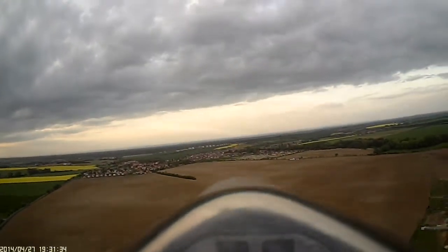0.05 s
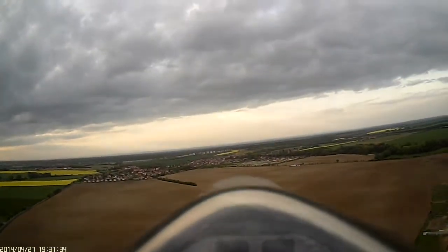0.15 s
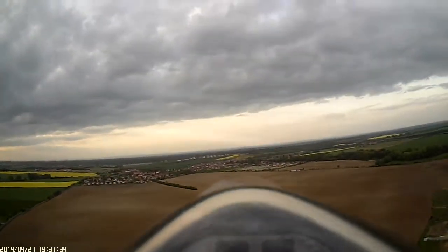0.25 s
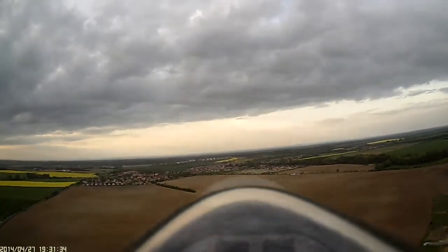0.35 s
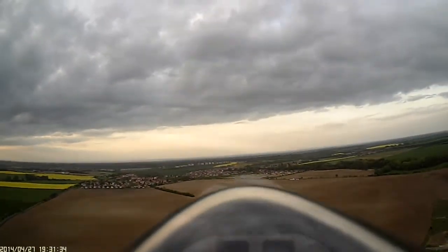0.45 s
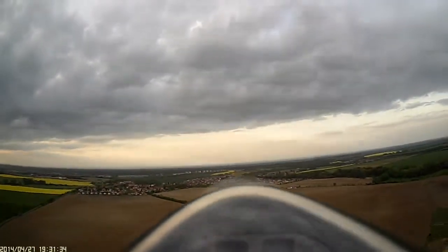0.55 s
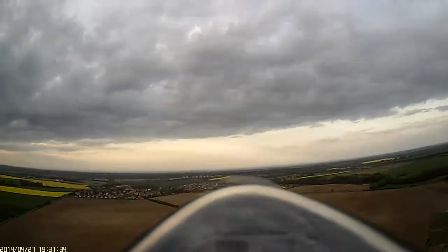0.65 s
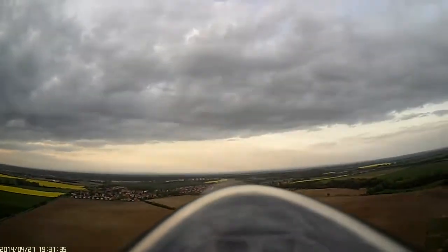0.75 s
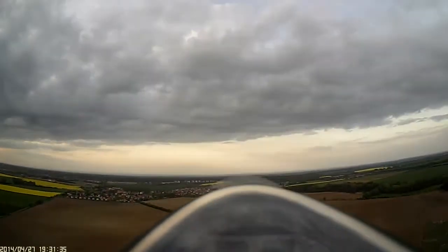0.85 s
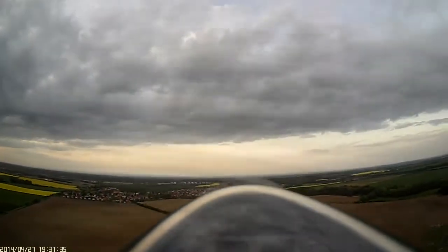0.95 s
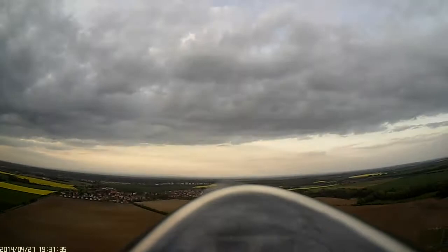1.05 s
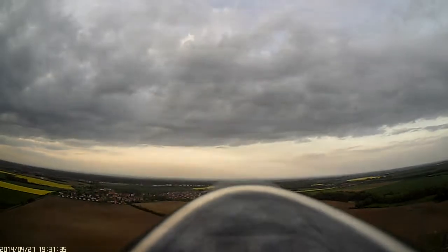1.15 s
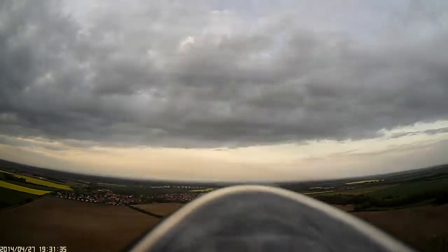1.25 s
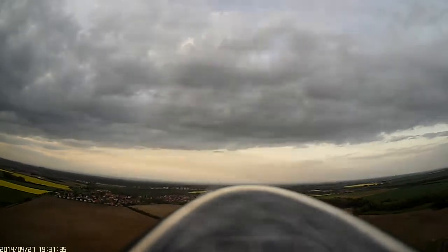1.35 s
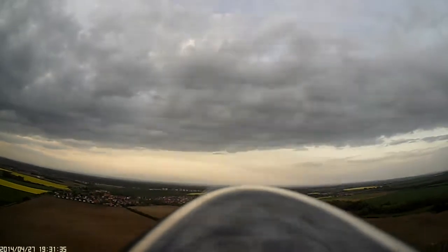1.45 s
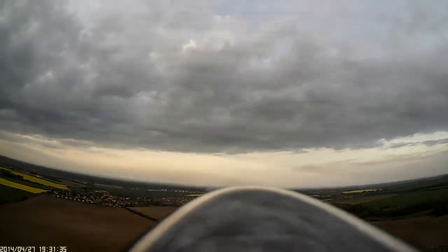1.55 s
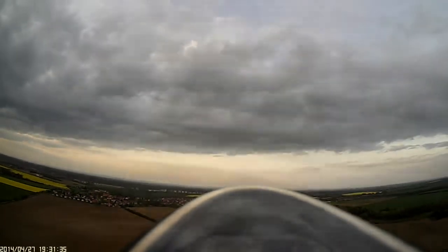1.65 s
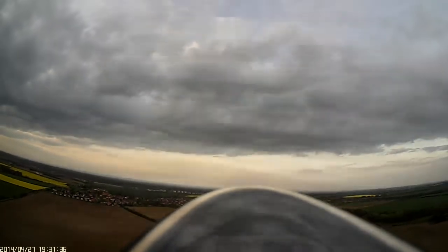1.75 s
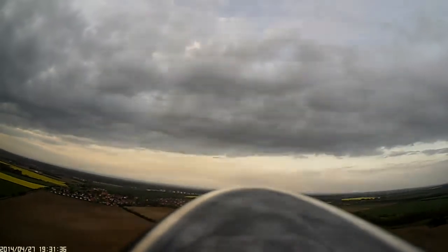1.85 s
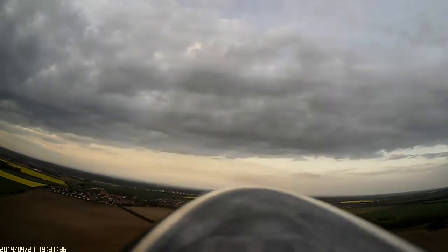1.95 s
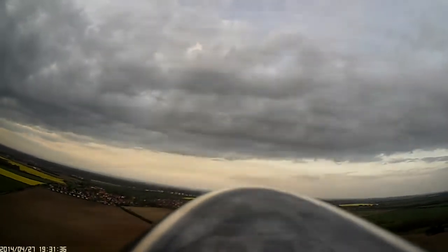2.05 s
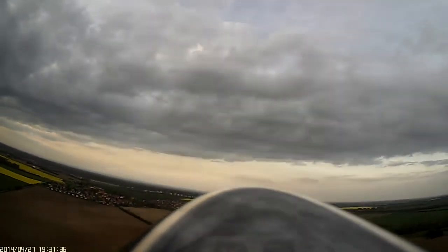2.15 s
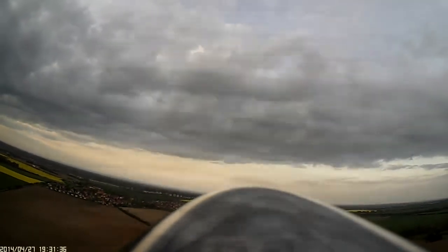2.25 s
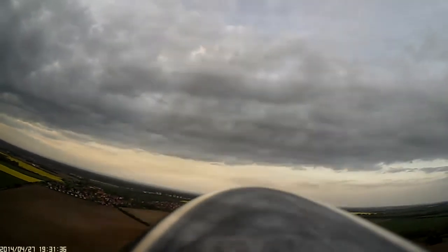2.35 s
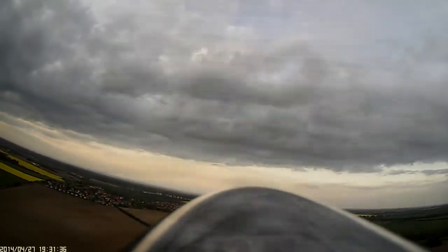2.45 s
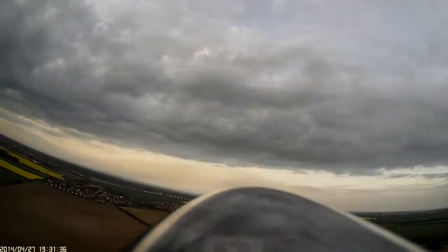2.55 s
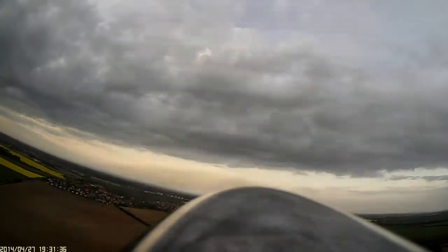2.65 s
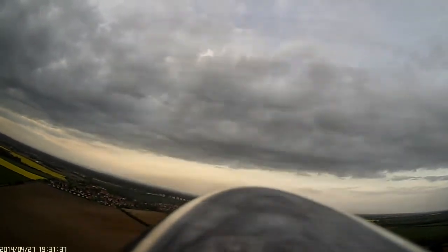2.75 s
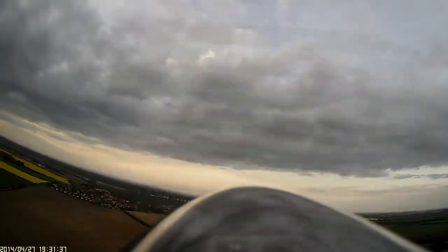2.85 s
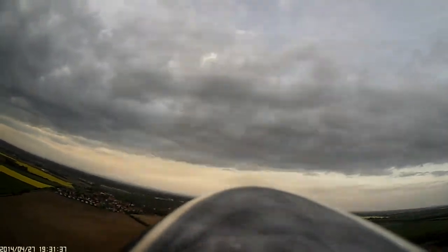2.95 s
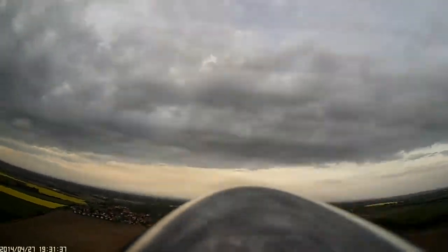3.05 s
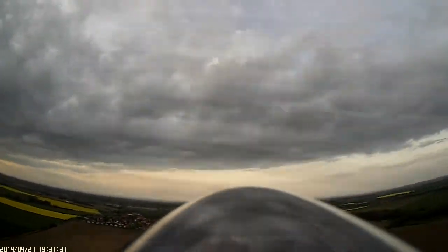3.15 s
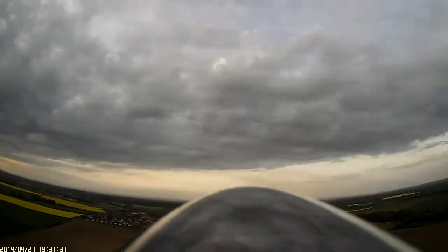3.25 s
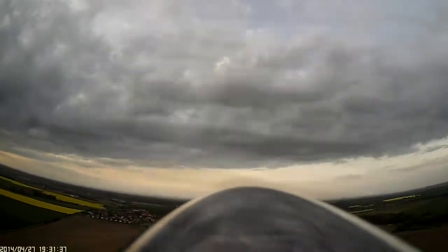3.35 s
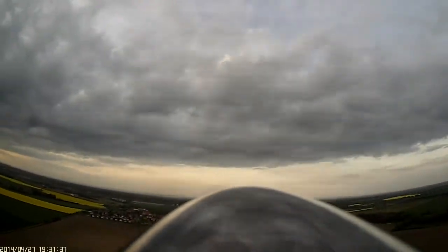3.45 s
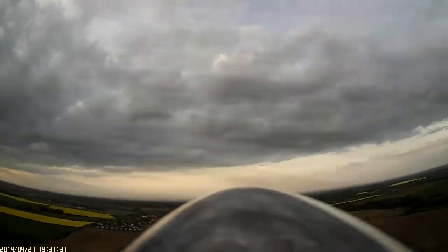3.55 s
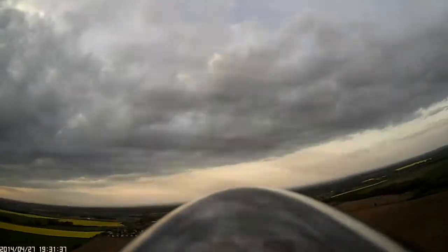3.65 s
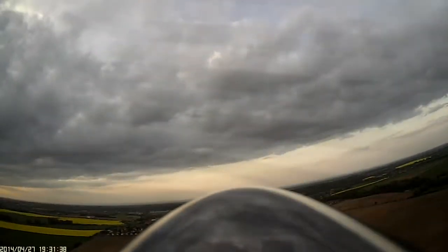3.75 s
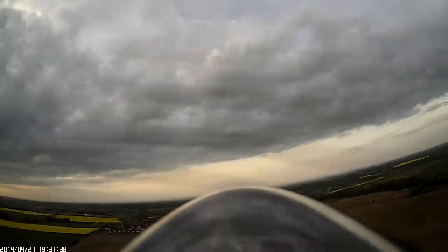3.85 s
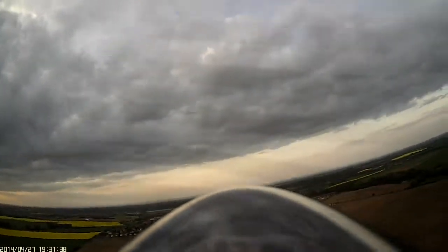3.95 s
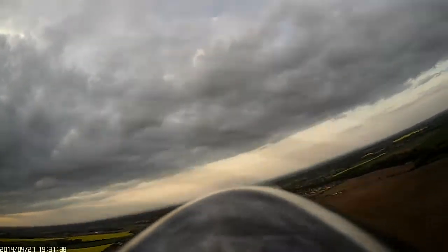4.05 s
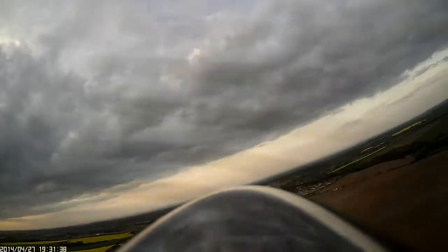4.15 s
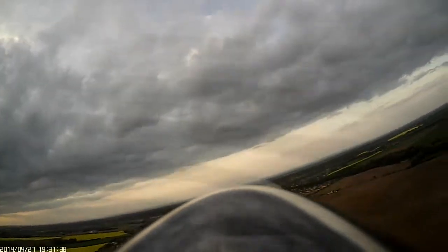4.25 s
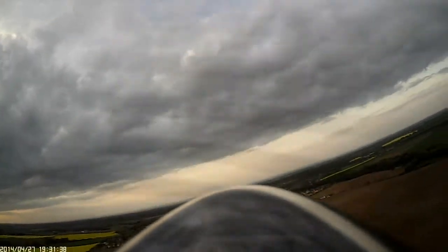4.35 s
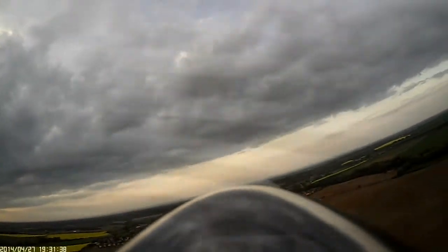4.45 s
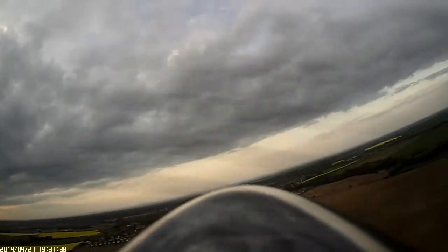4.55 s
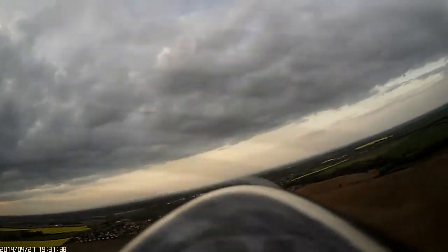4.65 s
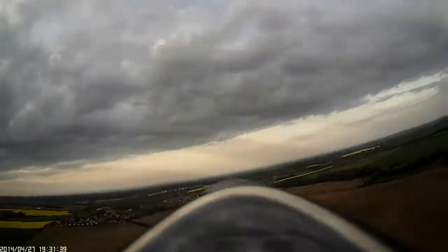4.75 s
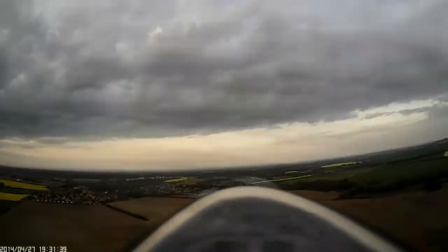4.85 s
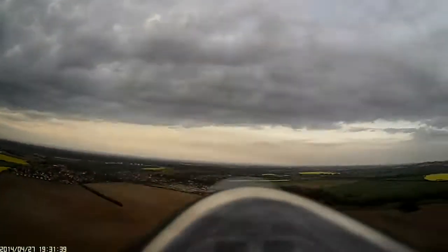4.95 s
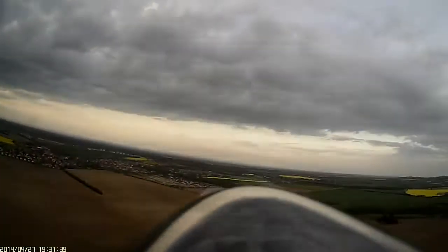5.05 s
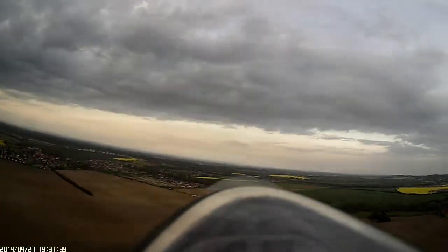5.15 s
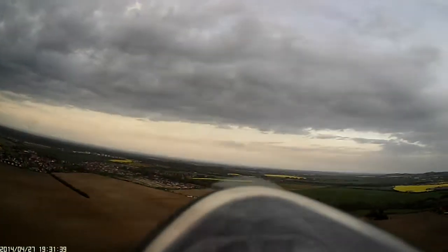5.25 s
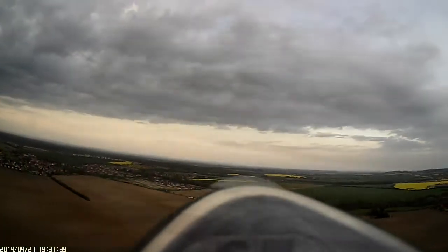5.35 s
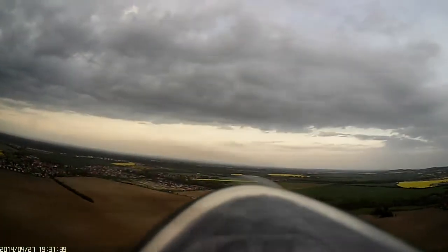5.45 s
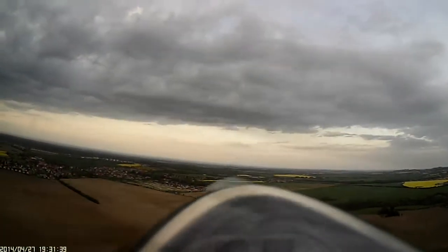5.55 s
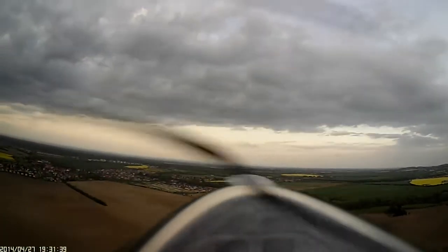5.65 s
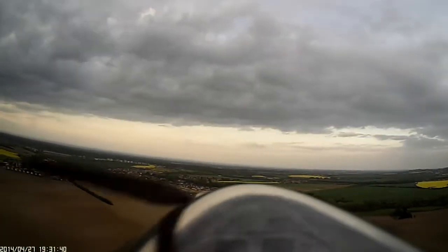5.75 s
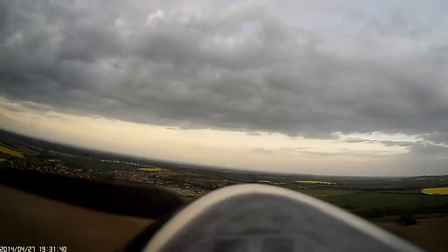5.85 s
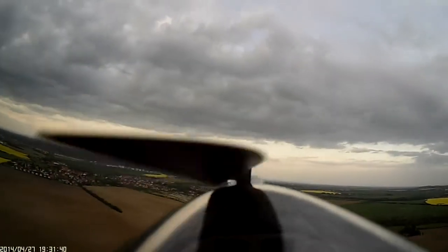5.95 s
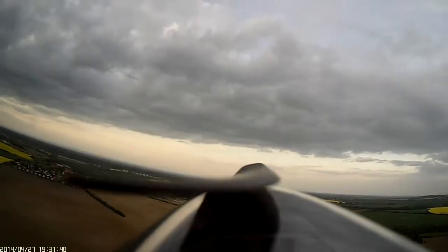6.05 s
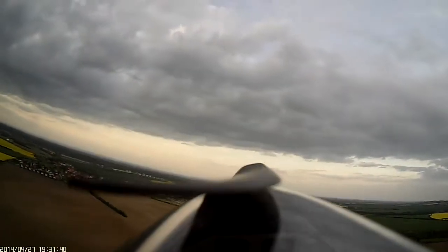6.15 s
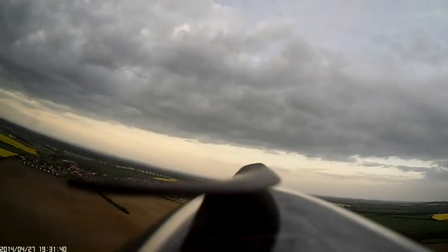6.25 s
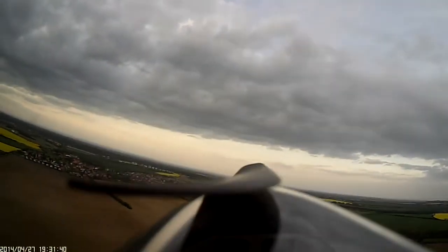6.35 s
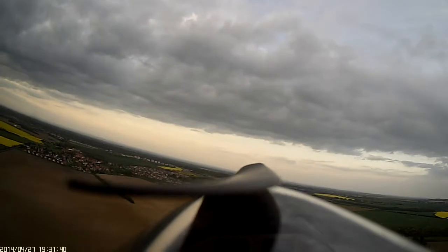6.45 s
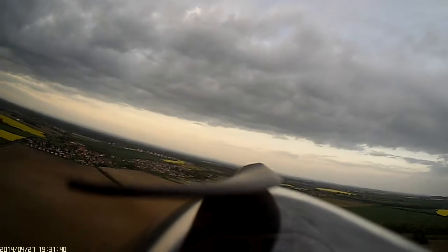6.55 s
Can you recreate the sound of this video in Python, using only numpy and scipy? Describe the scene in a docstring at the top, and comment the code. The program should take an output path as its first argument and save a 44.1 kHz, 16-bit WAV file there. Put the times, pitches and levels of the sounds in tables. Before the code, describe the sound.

On board a small electric model aircraft in open air, wind and prop wash batter the microphone into harsh, constant distortion, fluttering rapidly with the propeller blades. Near the end the motor runs down: a noisy howl rises and then sinks, the last blade passes thump, folding blades click, and only quieter, gusty gliding wind with a light spitting fizz remains.

```python
"""In open air behind the propeller of a small electric model aircraft, prop wash and wind buffet a microphone
into hard clipping: noise shaped in colour and level, chopped at the blade rate over a faint blade tone.
As the motor runs down a band of noise howls past, rising then sinking in pitch; the hiss of the windings
stops as it fades. The last blade wakes thump as short swings, the folding blades click as ringing cracks,
and gusty noise with a spitting fizz is left as the gliding wind."""
import sys
import numpy as np
from scipy import signal
from scipy.fft import rfft, irfft, next_fast_len
from scipy.io import wavfile
from scipy.ndimage import uniform_filter1d, map_coordinates

SR = 44100
rng = np.random.default_rng(int(sys.argv[2]) if len(sys.argv) > 2 else 0)


def transcribe(u):
    """Save the signal u as a 16-bit wav file named by the first command-line argument.

    u: samples, shape (n,) or (channels, n), limited to [-1, 1]; the rate is SR.
    q: integer samples, one column per channel.
    """
    v = np.clip(np.atleast_2d(u).T, -1, 1)
    q = np.round(v * 32767).astype(np.int16)
    wavfile.write(sys.argv[1], SR, q)


def undo_db(level):
    """Turn decibels back into plain size, where 20 dB means ten times bigger."""
    steps = np.asarray(level, float) / 20
    return 10 ** steps


N = 291059
TIME = np.arange(N) / SR  # [s]

# Air behind the propeller: (time [s], buffet level [dB], wash level [dB])
FLOW_LEVELS = [(0, -7, -4), (1, -10.5, -5), (2, -9, -6), (3, -10.5, -7.5), (3.6, -9.5, -8.5),
               (4.3, -10.5, -10), (4.73, -9, -8), (5.08, -20.5, -12.5), (5.22, -18.5, -11),
               (5.49, -25.5, -18.5), (5.62, -36, -32), (5.7, -98, -104)]
# Blades: (time [s], mean blade passes [Hz], mean tone level [dB], relative depth of the chop [0-1])
BLADE_PASSES = [(0, 200.1, -39, 1), (2.5, 199.4, -26, 1), (4.8, 196.4, -27, 1), (5.2, 174.7, -37, 1),
                (5.4, 135.4, -38, .4), (5.56, 92, -53, 0.5)]
# Colour of the slow buffeting: (frequency [Hz], relative density [dB])
BUFFET_COLOUR = [(15, -16), (30, -11.5), (60, -3.5), (110, -0.5), (200, 2), (350, -4.5), (600, -15),
                 (1200, -21)]
# Colour of the wash eddies: (frequency [Hz], relative density [dB])
WASH_COLOUR = [(100, -17), (300, 1), (500, -0.5), (1000, -4), (1800, -9), (2600, -15)]
# Colour of the tip vortices: (frequency [Hz], relative density [dB])
VORTEX_COLOUR = [(1200, -23), (2200, -3.5), (3000, -3), (4500, -9), (7000, -16.5), (11000, -22),
                 (16000, -24)]
# Eddies shed as the thrust dies: (time [s], centre [Hz], level [dB])
HOWL_SWEEP = [(4.45, 280, -35), (4.7, 350, -14), (4.9, 470, -15), (5.05, 600, -13), (5.2, 730, -10.5),
              (5.35, 690, -12), (5.48, 560, -15.5), (5.58, 450, -20), (5.65, 400, -60)]
# Swings of the last blade wakes: (time [s], swing level [dB], swing frequency [Hz])
BLADE_WAKES = [(5.554, -8, 400), (5.565, -6, 430), (5.585, -9, 500), (5.613, -11, 130), (5.629, -6, 280),
               (5.649, -4, 130), (5.679, -10, 130), (5.713, -5, 200), (5.719, -4, 180), (5.771, -8, 170),
               (5.78, -6, 120)]
# Clicks of the blade hinges: (time [s], level [dB], ring [Hz])
HINGE_CLICKS = [(5.6155, -43, 6000), (5.632, -34, 5000), (5.6515, -41, 6000), (5.6794, -44, 9000),
                (5.7764, -28, 4500), (5.9145, -15, 8000), (6.2965, -41, 5000)]
# Free air over the nose: (time [s], wind level [dB])
GLIDE_LEVELS = [(5.4, -87), (5.5, -26), (5.58, -20), (5.7, -18), (5.81, -19.5), (5.89, -15.5), (5.935, -16),
                (5.953, -21), (5.965, -15.5), (6.1, -16), (6.2, -19), (6.3, -18.5), (6.6, -20.5)]
# Colour of the gliding wind: (frequency [Hz], relative density [dB])
WIND_COLOUR = [(12, -50), (20, -16), (63, -9), (90, -7.5), (160, -4), (300, -6.5), (600, -8.5),
               (1200, -13.5), (2500, -25), (4500, -42), (7000, -58), (16000, -99)]
# Colour of the fizz on the wind: (frequency [Hz], relative density [dB])
FIZZ_COLOUR = [(1500, -41), (3000, 0), (5000, -6), (8000, -14), (12000, -22), (16000, -28)]
# Motor windings: (time [s], hiss level [dB], depth of the braking ripple [0-1])
MOTOR_LEVELS = [(0, -32, 0), (3, -42, 0), (5.3, -45, 0), (5.42, -47, 0.7), (5.55, -48, 0.83),
                (5.575, -90, .9)]
# Colour of the winding hiss: (frequency [Hz], relative density [dB])
HISS_COLOUR = [(4000, -30), (7000, -2), (10000, -2), (14000, -2), (16000, -20)]


def unit(x):
    """Scaled to rms 1."""
    return x / np.sqrt(np.mean(x ** 2) + 1e-20)


def noise():
    """White noise for the whole scene."""
    return rng.standard_normal(N)


def curves(rows):
    """One value per sample for each column after the time."""
    times, *columns = np.transpose(rows)
    return [np.interp(TIME, times, column) for column in columns]


def wobble(rate):
    """A smooth random curve, rate knots a second."""
    knots = rng.standard_normal(int(N * rate / SR) + 4)
    return map_coordinates(knots, [TIME * rate])


def filtered(x, response):
    """x through a gain that is a function of frequency."""
    size = next_fast_len(N + SR // 2)
    gain = response(np.fft.rfftfreq(size, 1 / SR))
    return irfft(rfft(x, size) * gain, size)[..., :N]


def coloured(x, points):
    """x through (frequency [Hz], gain [dB]) points read on a log axis."""
    f, db = np.transpose(points)
    return filtered(x, lambda hz: undo_db(np.interp(np.log(hz + 1), np.log(f + 1), db)))


def turns(hz):
    """Running phase of a frequency curve."""
    return 2 * np.pi * np.cumsum(hz) / SR


def airflow():
    """Prop wash on the port: slow buffeting, eddies chopped by each blade pass, and spitting tip vortices."""
    buffet_db, wash_db = curves(FLOW_LEVELS)
    blade_hz, tone_db, chop = curves(BLADE_PASSES)
    blade = turns(blade_hz * (1 + .014 * wobble(8)))

    surge = undo_db(1.2 * wobble(12) + 1.5 * wobble(3))
    buffet = unit(coloured(surge * noise(), BUFFET_COLOUR + [(5000, -120)]))

    burst = wobble(120) + chop * np.cos(blade)
    eddies = undo_db(1.5 * burst + 0.66 * wobble(4.01))
    wash = unit(coloured(eddies * noise(), WASH_COLOUR + [(6000, -37), (16000, -120)]))

    spits = undo_db(1.5 * burst + 3 * wobble(600))
    vortices = unit(coloured(spits * noise(), VORTEX_COLOUR))

    tone = undo_db(tone_db + 3.2 * wobble(6)) * np.sqrt(2) * np.sin(blade)
    return undo_db(buffet_db) * buffet + undo_db(wash_db) * (wash + undo_db(-14.5) * vortices) + tone


def howl():
    """Shed eddies: a broad band of noise riding on the shedding frequency."""
    centre_hz, db = curves(HOWL_SWEEP)
    phase = turns(centre_hz)
    # two slow noises in quadrature spread the band to both sides of its centre
    slow = filtered(rng.standard_normal((2, N)), lambda f: 1 / (1 + (f / 210) ** 2))
    return undo_db(db) * unit(slow[0] * np.cos(phase) + slow[1] * np.sin(phase))


def wakes():
    """The slow blades throw short, ragged pressure swings on the port, some passes as a close pair."""
    out, t = np.zeros(N), np.arange(SR // 20) / SR
    for start, db, hz in BLADE_WAKES:
        progress = np.minimum(hz * t / 1.1, 1)  # a swing lasts 1.1 cycles
        rough = rng.standard_normal(len(t))
        ragged = unit(uniform_filter1d(uniform_filter1d(rough, size=30), size=20))
        swing = np.sin(2 * np.pi * hz * t + rng.uniform(-.3, .3)) + .3 * ragged
        out[round(start * SR):][:len(t)] += undo_db(db) * np.sin(np.pi * progress) * swing
    return out


def clicks():
    """A short crack through the broad ring of the plastic hinge."""
    t60 = .006  # s
    out, t = np.zeros(N), np.arange(SR // 20) / SR
    for start, db, hz in HINGE_CLICKS:
        snap_and_rattle = 4 * (t == 0) + rng.standard_normal(len(t))
        crack = undo_db(db + 7 - 60 * t / t60) * snap_and_rattle
        out[round(start * SR):][:len(t)] += signal.lfilter(*signal.iirpeak(hz, 1.8, SR), crack)
    return out


def motor():
    """The windings hiss in short spits, ripple under the brake and carry the controller's faint switching tone."""
    brake_hz, whine_hz = 62, 9114  # current pulses of the brake; mean switching tone
    whine_db, whine_off_s, whine_fade = -50.5, 5.25, 400  # mean level, start of the fade, dB per s
    hiss_db, depth = curves(MOTOR_LEVELS)

    ripple = 1 + np.clip(depth, 0, 1) * np.cos(2 * np.pi * brake_hz * (TIME - 5.549))
    spits = undo_db(1.2 * wobble(28) + 2.5 * wobble(300)) * ripple
    hiss = unit(coloured(spits * noise(), HISS_COLOUR))

    whine = undo_db(wobble(5)) * np.sqrt(2) * np.sin(turns(whine_hz + 3 * wobble(4)))
    whine_level = undo_db(whine_db - whine_fade * np.maximum(TIME - whine_off_s, 0))
    return undo_db(hiss_db) * hiss + whine_level * whine


def glide():
    """Gusty wind; its fizz comes in short spits that follow the gusts and grows faster than the wind."""
    fizz_ref_db, wind_ref_db = -48.5, -18  # fizz level at that wind level
    fizz_growth = 1.2  # dB of fizz for each dB of wind
    fade_start_s, fade_rate = 6.05, 12  # dB per s: the fizz thins out as the glide slows
    wind_db, = curves(GLIDE_LEVELS)
    fizz_db = fizz_ref_db + fizz_growth * (wind_db - wind_ref_db)
    fizz_db = fizz_db - fade_rate * np.maximum(TIME - fade_start_s, 0)

    gust = wobble(70)
    wind = unit(coloured(undo_db(1.76 * gust) * noise(), WIND_COLOUR))
    spits = undo_db(1.2 * gust + 3.5 * wobble(400))
    fizz = unit(coloured(spits * noise(), FIZZ_COLOUR))
    return undo_db(wind_db) * wind + undo_db(fizz_db) * fizz


def scene():
    """Everything arrives at one microphone port in open air."""
    mix = airflow() + howl() + wakes() + clicks() + motor() + glide()
    return mix[None]  # one channel


def top_cut(x):
    """Nothing passes above the cut-off."""
    return signal.sosfilt(signal.butter(12, 15710, fs=SR, output="sos"), x)


def record(dry):
    """The input stage clips hard, then the converter's filter dulls the corners."""
    ceiling = undo_db(-3)
    fine = signal.resample_poly(dry, 2, 1, axis=1)  # clipped at twice the rate, so less folds back
    flat = signal.resample_poly(np.clip(fine, -ceiling, ceiling), 1, 2, axis=1)
    dull = filtered(flat, lambda hz: 1 / (1 + (hz / 11700) ** 2.6))  # half amplitude at 11700 Hz
    return top_cut(dull)


dry = scene()
out = record(dry)
transcribe(out)
```